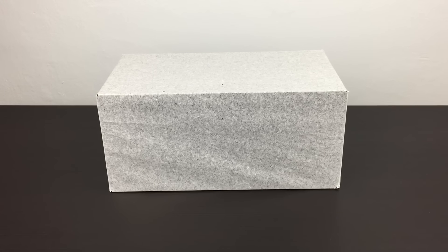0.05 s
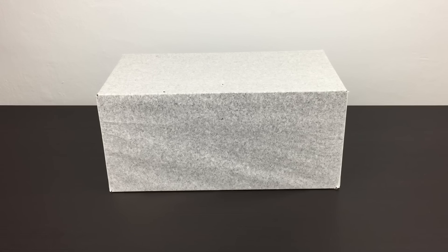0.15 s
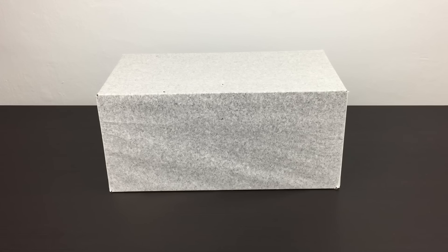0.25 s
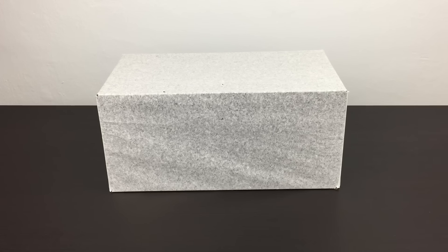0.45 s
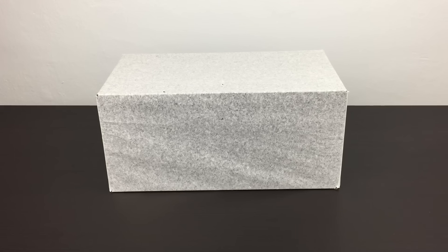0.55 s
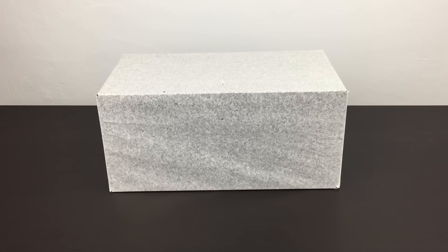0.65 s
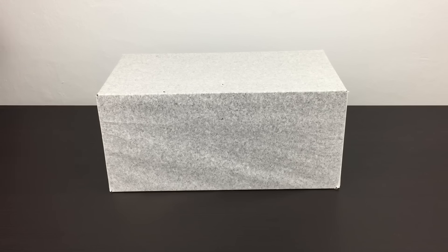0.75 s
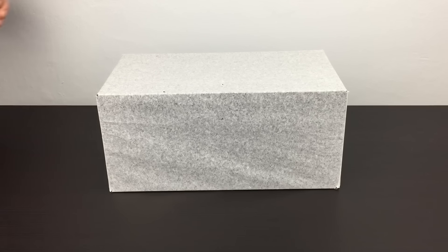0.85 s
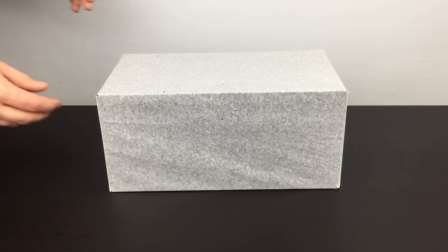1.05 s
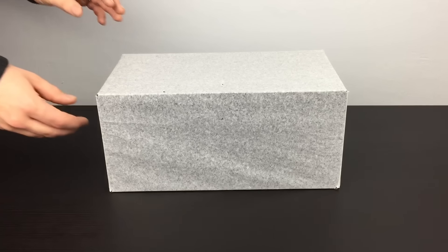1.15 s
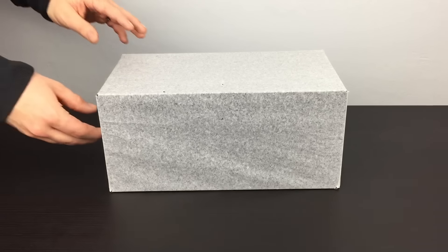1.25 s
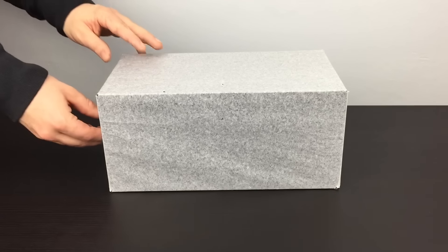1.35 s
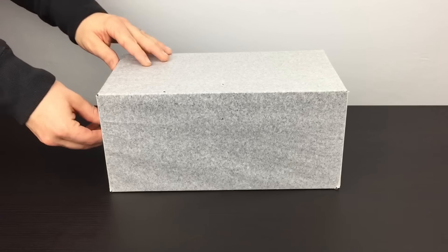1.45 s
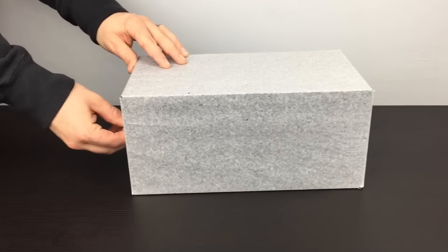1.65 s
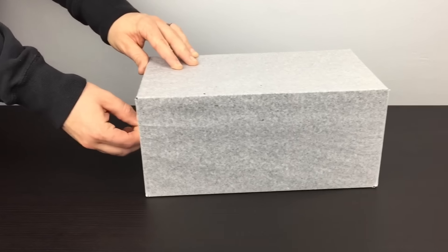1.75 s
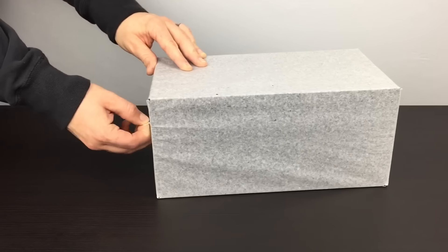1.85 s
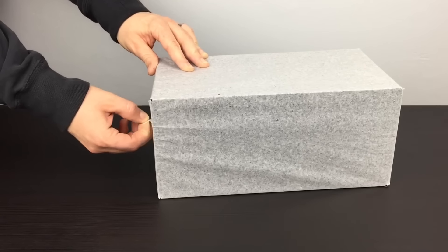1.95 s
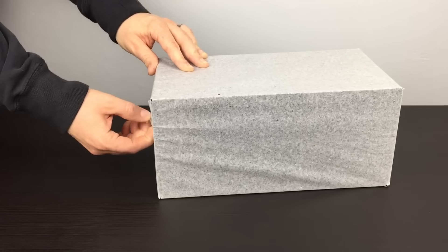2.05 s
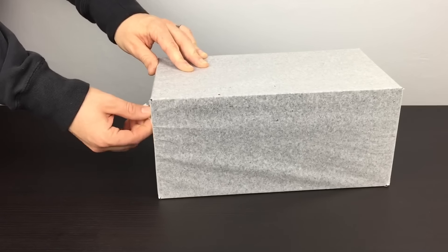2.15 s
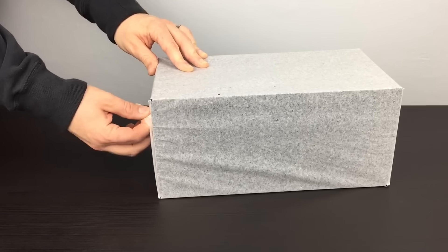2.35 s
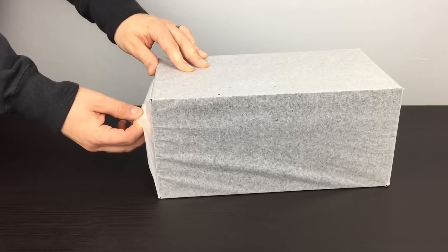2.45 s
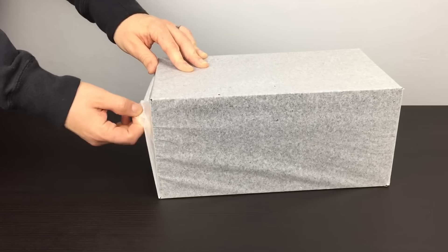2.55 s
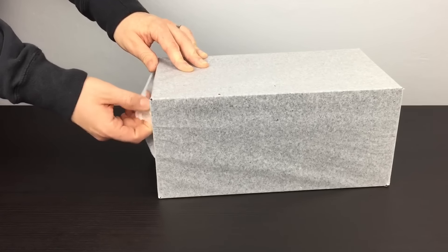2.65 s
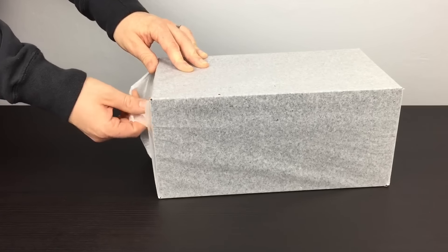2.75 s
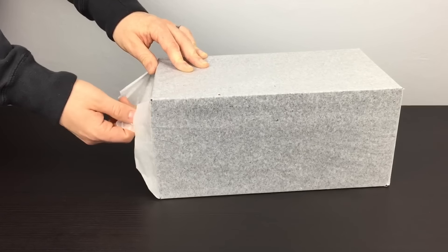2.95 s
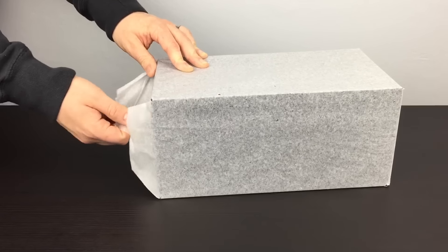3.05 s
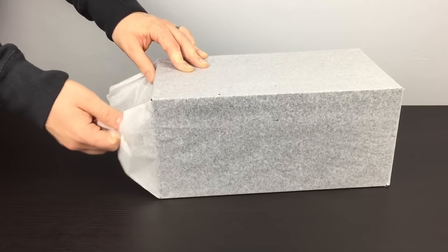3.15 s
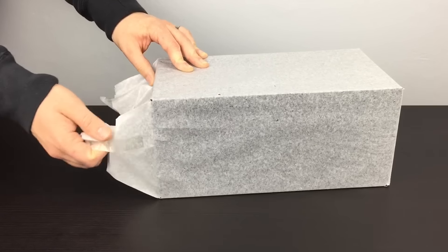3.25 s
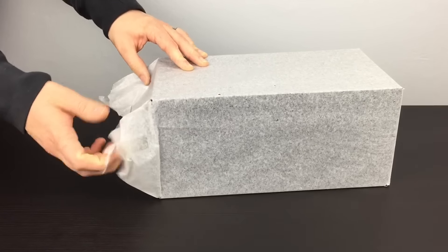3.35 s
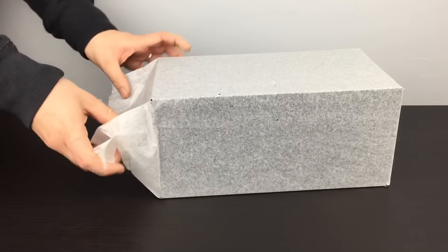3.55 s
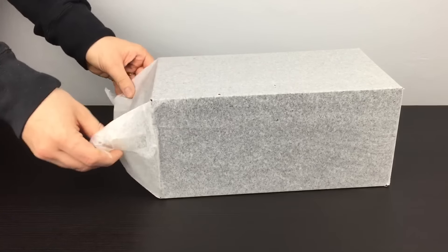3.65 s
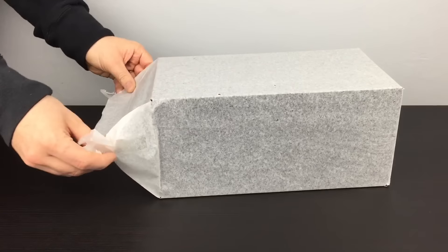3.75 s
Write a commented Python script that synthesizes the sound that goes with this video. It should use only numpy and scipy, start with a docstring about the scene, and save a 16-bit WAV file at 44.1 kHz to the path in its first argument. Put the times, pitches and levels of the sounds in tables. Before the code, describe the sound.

A few soft, hollow finger taps on a cardboard box sound through the first second and a half, with a thin, faint tick near 0.4 seconds and a brief sliding rub at about 1.5. From 1.9 seconds thin wrapping paper is picked at and pulled, crackling in short, uneven bursts with sharp snaps among the tiny clicks. The sheet flaps and the box walls boom lightly under the hands. At about 4.7 seconds a louder tear comes with a dull thud of the box on the table. Dense tearing and crumpling continue, with another bump near 5.9 and a strong crackling stretch from 6.2 to 6.6. The paper dies down around 7 seconds, then softer rustles and small bumps return until nearly 8. Everything is close, in a small room with slight echo and a faint low hum.

```python
"""Unwrapping a cardboard box.

Fingers tap an empty box on a table in a small room; thin paper is picked at, torn and crumpled off it.
Creases buckle in dense swarms of tiny clicks with louder snaps among them. The sheet flaps, the walls
boom under the hands, the box thuds on the table."""
import sys
import numpy as np
from scipy import signal
from scipy.fft import rfft, irfft
from scipy.io import wavfile

SR = 44100
rng = np.random.default_rng(int(sys.argv[2]) if len(sys.argv) > 2 else 0)


def wrap_up_sound(samples):
    """Save the sound to the file named by the first command line argument, as 16-bit audio."""
    columns = np.atleast_2d(samples).T
    # keep every value between -1 and 1, then stretch to whole-number steps
    tamed = np.clip(columns, -1, 1)
    steps = np.round(tamed * 32767).astype(np.int16)
    wavfile.write(sys.argv[1], SR, steps)


N = 347949
STEP = 32   # samples per slow-control point

# room noise spectrum: freq_hz, density_db
HUM_SPECTRUM = [(15, -62), (25, -29), (50, -14), (91, -10), (133, -7), (165, -28), (184, 1), (205, -6),
                (235, -15), (324, -18.5), (2890, -26), (4950, -28), (5980, -29), (15800, -36)]
# notches from the table echo at the microphone: centre_hz, width_hz, depth (0-1)
TABLE_NOTCHES = [(4940, 320, 0.37), (7570, 700, 0.29), (10350, 460, 0.65)]
# thin double tick: start_s, level_db
TICKS = [(.3554, -15.5), (.3561, -13.5)]
# box shifting on the table: start_s, level_db, pitch_hz
THUDS = [(1.27, -49, 146), (1.54, -45, 141), (1.824, -43, 165), (2.162, -41.5, 139), (2.477, -47, 113),
         (2.762, -46, 135), (3.109, -39.5, 138), (3.5, -53, 50), (3.695, -48, 124), (4.655, -39, 121),
         (4.728, -32, 159.5), (5.012, -47, 145), (5.156, -45, 139), (5.88, -35, 121), (6.233, -42, 117),
         (6.672, -47, 144), (7.328, -51, 67), (7.478, -45.5, 127), (7.563, -49, 83.6), (7.68, -50, 121)]
# cardboard wall modes: pitch_hz, level_db, t60_s
WALL_MODES = [(213, -14.5, 0.18), (270, -16, 0.14), (340, -15, 0.084), (401, 0.5, 0.086), (506, -8, 0.11),
              (574, -6, 0.076), (649, -5, 0.1), (810, -15, 0.1), (2100, 17, 0.056), (2300, -16, .04)]
# fingers landing on the box: start_s, level_db, lowpass_hz
TAPS = [(.002, -41.5, 600), (.021, -39, 596), (.037, -41, 600), (0.052, -52, 590), (0.077, -58, 710),
        (.092, -53, 700), (.852, -46, 500), (.875, -47, 496), (0.93, -59, 450), (1.085, -58.5, 1200),
        (1.271, -35.5, 890), (1.293, -42, 1010), (1.329, -42, 900), (1.551, -56, 300)]
# spectrum of the handled box: freq_hz, density_db
BOOM_SPECTRUM = [(24, -57), (40, -83), (115, -26), (161, -7), (194, 0), (312, 1.5), (350, -6.5), (392, -8),
                 (578, -1.5), (800, -12.5), (1040, -34), (1760, -120)]
# paper spectrum: freq_hz, density_db
PAPER_SPECTRUM = [(410, -36), (700, -5), (1790, -5.5), (2430, -3.5), (3750, -6.5), (5020, -9.5),
                  (6450, -1.5), (9220, -10), (10300, -5), (11900, -11.5), (15000, -8), (15900, -24.5),
                  (16500, -31)]
# hands sliding (0) to creases breaking (1): time_s, crispness
CRISPNESS = [(0, 0.3), (1.87, 0.02), (1.89, 0.98), (7.27, 1.0), (7.285, 0.46), (7.42, 0.3), (7.44, 0.78),
             (7.89, 0.9)]
# pulls, rubs and squeezes: start_s, swell_s, hold_s, crackle_db, fizz_db, flap_db, boom_db, taut_db,
# boom_hz; fizz to taut are relative to crackle
PULLS = [(0.0, 0.003, 0.056, -66, -3, -2, 13, -8, 360), (0.106, 0.057, 0.01, -61, 0.5, -5, -2, -20.2, 440),
         (0.849, 0.0025, 0.027, -64.5, -1.5, 2.5, 8.5, -14, 308),
         (1.068, 0.012, 0.02, -67, 7, -2.5, -5, -16, 457),
         (1.269, 0.0047, 0.041, -57, -2, -10, 7.5, -8.1, 415),
         (1.534, 0.073, 0.33, -51.5, -4, -1.5, -8, -8, 297),
         (1.886, 0.012, 0.071, -49, -2.5, -6.5, -9, -27, 290),
         (2.067, 0.031, 0.0023, -58, 5.5, -6, -9, -18.2, 240),
         (2.13, 0.024, 0.0022, -39.5, -1.5, 0, -6, -19, 303),
         (2.23, 0.082, 0.028, -53.5, -0.3, -6, -13, -3, 260),
         (2.413, 0.066, 0.056, -47.5, -5, -6, -11.4, -15, 360),
         (2.492, 0.037, 0.037, -45.5, -18, -2, -11.7, -17.9, 440),
         (2.587, 0.084, 0.036, -45.5, -2.5, -4.2, -13, -16.5, 390),
         (2.738, 0.0035, 0.0022, -41, 4, -0.5, -5.5, -20, 308),
         (2.773, 0.0074, 0.014, -40.5, -5, -11, -15, -20, 320),
         (2.847, 0.024, 0.002, -39, -4.5, -1.5, -4.5, -18.2, 430),
         (2.903, 0.005, 0.014, -49.5, -10, -3, -5, -3, 350),
         (2.998, 0.021, 0.011, -47, -6, -2, -5.5, -18, 510),
         (3.069, 0.02, 0.052, -47, -1, 1.5, -4, -16, 403),
         (3.229, 0.048, 0.069, -44, -2.5, -4.5, -7.8, -25, 316),
         (3.411, 0.019, 0.034, -47.9, -1, -4.5, -10.5, -15, 344),
         (3.489, 0.012, 0.002, -48.5, -5, -5, -0.5, -9, 230),
         (3.593, 0.081, 0.15, -42.5, -3, -3.5, -6.5, -13, 384),
         (3.846, 0.039, 0.003, -40.5, -1, -5.5, -8, -19.4, 350),
         (3.912, 0.076, 0.07, -45.0, -2.5, -4, -5.5, -18, 383),
         (4.153, 0.012, 0.002, -54.5, 2, -3, -11.5, -17, 490),
         (4.23, 0.011, 0.005, -55.5, 2.5, -5, -2, -17.2, 300),
         (4.277, 0.039, 0.002, -51.5, -0.5, -0.5, -13, -5, 480),
         (4.387, 0.092, 0.038, -45, -1.5, -1.5, -3.5, -12, 437),
         (4.568, 0.023, 0.009, -39, -4, -8.5, -8, -26, 360),
         (4.635, 0.064, 0.067, -30.5, 0.2, -4, -7.5, -17, 350),
         (4.859, 0.029, 0.068, -39.5, -1.5, -3, -7.5, -11, 460),
         (4.987, 0.004, 0.021, -39.5, -1.5, -5, -13, -25, 500),
         (5.134, 0.034, 0.033, -34, -2, -4, -15, -10, 414),
         (5.269, 0.052, 0.022, -32, 2, -0.2, -6.2, -5.5, 460),
         (5.509, 0.013, 0.051, -57.6, -9, -3, -10.5, 7.5, 350),
         (5.565, 0.06, 0.146, -36.6, 2, -9.5, -10, -6.5, 330),
         (5.72, 0.0037, 0.17, -35.5, -1, -7.5, -8, -5.5, 315),
         (5.898, 0.032, 0.053, -43, 3.7, -2.5, -4.5, -6, 370),
         (5.983, 0.013, 0.033, -46.5, -3, -6, -12.5, -18, 340),
         (6.146, 0.061, 0.0022, -50, -1.4, -11, -10, -3, 300),
         (6.22, 0.0048, 0.09, -42.5, -1, -5.5, -1, -5.7, 360),
         (6.268, 0.037, 0.11, -32, 0.5, -4, -7, -8, 420), (6.37, 0.038, 0.16, -31, 2, -6, -17.5, -14, 473),
         (6.577, 0.041, 0.032, -37, 3, -6.5, -16.5, -11, 480),
         (6.721, 0.015, 0.14, -47.5, 0.2, -4.5, -9.6, -15, 390),
         (6.902, 0.02, 0.044, -57.5, 2, -8, -15, -11, 320),
         (7.12, 0.056, 0.076, -73, -2, -1.5, -3, -12, 270),
         (7.28, 0.014, 0.064, -48, -4, -12, -20, -6.5, 260),
         (7.429, 0.028, 0.046, -50.2, -1.5, 0.5, -4.5, -18, 300),
         (7.552, 0.022, 0.011, -50, -5.6, 0.5, -10, -14.8, 390),
         (7.662, 0.029, 0.081, -65, -2, 5, -5, 0, 260), (7.789, 0.086, 0.048, -45.5, 0, 0.8, -9, -9, 372)]
# loudest creases: start_s, level_db, pitch_hz, treble_db (relative to level)
SNAPS = [(1.5374, -33, 1780, -21), (1.8905, -22.5, 4300, -23), (1.9054, -17.5, 3670, -29),
         (1.937, -26, 6070, -23), (1.9424, -22.5, 6060, -26), (1.9604, -19.5, 6300, -25),
         (1.9829, -23, 6140, -17), (2.0047, -24, 6100, -16), (2.0976, -31, 6160, -18),
         (2.13, -31, 2920, -18), (2.148, -17, 1430, -16), (2.257, -29, 6090, -20), (2.2744, -40, 1860, -11),
         (2.2913, -26.5, 6700, -12), (2.3094, -32, 3330, -10), (2.406, -32, 2430, -17.5),
         (2.4389, -33, 1370, -13), (2.4504, -31, 1410, -13), (2.4566, -27.5, 2410, -6),
         (2.5077, -24.5, 3760, -13), (2.5416, -29, 2410, -8), (2.6509, -37, 6310, -15),
         (2.7414, -28, 2380, -22), (2.7784, -32, 6420, -16), (2.7844, -30, 2710, -18),
         (2.8214, -37, 2350, -9), (2.853, -27, 2480, -7), (2.8654, -14, 3660, -14.5),
         (2.9096, -21, 1460, -15), (3.02, -32, 2530, -12), (3.0859, -38, 1810, -17), (3.25, -34, 2450, -19),
         (3.2634, -34, 1520, -16), (3.2844, -26, 3180, -19), (3.3042, -26, 2300, -12),
         (3.4366, -35, 2120, -13), (3.4585, -23.5, 3850, -16), (3.4986, -31, 1890, -16),
         (3.5423, -33, 4020, -20), (3.6341, -36, 1020, -18), (3.6642, -22, 2010, -15),
         (3.7127, -14.5, 4210, -15.5), (3.7524, -22, 2070, -18), (3.7874, -24, 1970, -15),
         (3.8871, -18.5, 2480, -14), (3.933, -25, 6310, -15), (3.9544, -28, 2090, -11),
         (3.9855, -19.5, 5940, -17), (3.9994, -22, 1940, -9), (4.0387, -27, 2520, -19),
         (4.1828, -25.5, 2240, -24), (4.2472, -30, 5200, -16), (4.3057, -31, 1710, -24),
         (4.4076, -26.5, 1210, -22), (4.465, -18.5, 2440, -16), (4.5504, -29, 2590, -14),
         (4.579, -25.5, 5860, -14), (4.5885, -25, 6970, -22), (4.5955, -24, 2430, -16),
         (4.6378, -20, 3020, -16), (4.6585, -12.5, 2170, -14), (4.706, -14, 2760, -10),
         (4.75, -12, 5850, -16), (4.87, -20, 1900, -16), (4.887, -19, 6500, -18),
         (4.9096, -16.5, 6080, -21.5), (4.9886, -21.5, 1080, -8), (5.053, -29, 2450, -17),
         (5.1372, -35, 2920, -17), (5.1575, -18, 6640, -12), (5.2774, -21, 3530, -15),
         (5.2987, -12, 1450, -18), (5.3092, -16.5, 1810, -7), (5.5245, -36, 1770, -12),
         (5.548, -40, 1830, -23), (5.568, -19.5, 1580, -12.5), (5.5914, -18.5, 1940, -21),
         (5.608, -15, 6380, -23), (5.6384, -18, 3380, -15), (5.6585, -16, 6480, -10),
         (5.7237, -14, 1480, -9), (5.8314, -29, 2390, -14), (6.158, -36, 1710, -15),
         (6.1993, -37, 1800, -12), (6.222, -27, 1790, -9), (6.257, -26, 1660, -14),
         (6.2722, -14.5, 1770, -20), (6.3036, -22, 5810, -12), (6.3474, -15, 1750, -8),
         (6.399, -21, 1990, -24), (6.414, -14, 4470, -23), (6.4388, -7.5, 4000, -23),
         (6.5554, -20, 6710, -14), (6.6051, -19.5, 1690, -1.5), (6.7714, -26, 2730, -19),
         (6.8331, -26, 1360, -15), (6.8604, -29, 2100, -14), (7.0354, -41, 5870, -14),
         (7.089, -40, 3000, -18), (7.181, -49, 1960, -19), (7.2838, -41, 2000, -20),
         (7.3314, -27.5, 2190, -14), (7.4425, -42, 1870, -16), (7.4817, -30, 2380, -14),
         (7.5576, -30, 1020, -18), (7.6123, -30, 1020, -28), (7.794, -42, 1500, -10),
         (7.8366, -37, 1610, -13), (7.859, -27, 1750, -8)]


def from_db(db):
    """Decibels to gain."""
    return 10 ** (np.asarray(db) / 20)


def decay(t, t60_s):
    """Exponential fade, 60 dB in t60_s."""
    return from_db(-60 * t / t60_s)


def unit_rms(x):
    """Scale to rms 1."""
    return x / np.sqrt(np.mean(x ** 2) + 1e-20)


def high_pass(x, hz, order=4):
    """Butterworth high-pass."""
    return signal.sosfilt(signal.butter(order, hz, "high", fs=SR, output="sos"), x)


def spectrum_db(spectrum, hz):
    """Read a spectrum on a log-frequency axis."""
    freq_hz, density_db = np.transpose(spectrum)
    return np.interp(np.log(hz), np.log(freq_hz), density_db)


def per_sample(control):
    """Slow control to audio rate."""
    return np.interp(np.arange(N) / STEP, np.arange(len(control)), control)


def drift(rate_hz):
    """Slow random control, rms 1."""
    r = np.exp(-2 * np.pi * rate_hz * STEP / SR)
    noise = rng.standard_normal(N // STEP + 2002)
    return unit_rms(signal.lfilter([1], [1, -2 * r, r * r], noise)[2000:])


def ring(clicks, hz, t60_s):
    """Resonator: a unit click starts a decaying unit sine."""
    r, w = decay(1 / SR, t60_s), 2 * np.pi * hz / SR
    return signal.lfilter([0, np.sin(w)], [1, -2 * r * np.cos(w), r * r], clicks + 1e-18)


def room_hum(level_db=-66.5):
    """Steady room noise, mostly low."""
    hz = np.maximum(np.arange(N // 2 + 1) * SR / N, 1)
    shaped = rfft(rng.standard_normal(N)) * from_db(spectrum_db(HUM_SPECTRUM, hz))
    return from_db(level_db) * unit_rms(irfft(shaped, N))


def room_echoes(x, t60_s=0.43, level_db=-9, patterns_per_s=1.368):
    """Diffuse, slightly dull echoes; the pattern changes as hands and sheet move."""
    t, out = np.arange(SR // 3) / SR, 0
    turn = np.arange(N) / SR * patterns_per_s
    for k in range(3):
        tail = rng.standard_normal(len(t)) * decay(t, t60_s) * (t > .003)
        tail = signal.lfilter([1], [1, -.3], tail)
        share = np.sqrt(2 / 3) * np.cos(np.pi * (turn - k) / 3)
        out += signal.oaconvolve(share * x, tail / np.sqrt(np.sum(tail ** 2)))[:N]
    return from_db(level_db) * out


def table_echo(x):
    """The table-top reflection partly cancels three treble bands."""
    for hz, width_hz, depth in TABLE_NOTCHES:
        x = x - depth * signal.lfilter(*signal.iirpeak(hz, hz / width_hz, fs=SR), x)
    return x


def tick():
    """Two top-octave clicks and a thin fading hiss."""
    clicks, since_s = np.zeros(N), np.arange(N) / SR - TICKS[0][0]
    for start_s, level_db in TICKS:
        clicks[round(start_s * SR)] = from_db(level_db)
    hiss = rng.standard_normal(N) * (since_s >= 0) * from_db(-46) * decay(abs(since_s), .3)
    hiss = signal.lfilter([.75, .75], [1], hiss)
    band = signal.butter(5, [9100, 14600], "band", fs=SR, output="sos")
    return signal.sosfilt(band, clicks + hiss) + .05 * high_pass(clicks, 2800)


def box_thuds():
    """The box shifts on the table: a low tone swells fast and rings out."""
    t = np.arange(SR // 4) / SR
    out = np.zeros(N + len(t))
    envelope = (1 - np.exp(-t / 0.01)) * decay(t, 0.17)
    for start_s, level_db, hz in THUDS:
        at = round(start_s * SR)
        out[at:at + len(t)] += from_db(level_db) * envelope * np.sin(2 * np.pi * hz * t)
    return out[:N]


def finger_taps(spread_db=3):
    """A fingertip strikes the wall modes unevenly; a soft touch spares the high ones."""
    start_s, level_db, lowpass_hz = np.transpose(TAPS)
    at = np.round(start_s * SR).astype(int)
    out, uneven_db = np.zeros(N), rng.normal(-3, spread_db, (len(TAPS), len(WALL_MODES)))
    for (hz, mode_db, t60_s), strike_db in zip(WALL_MODES, uneven_db.T):
        clicks = np.zeros(N)
        clicks[at] = from_db(level_db + mode_db + strike_db) / (1 + (hz / lowpass_hz) ** 4)
        out += ring(clicks, hz, t60_s)
    return high_pass(out, 110, order=2)


def crispness(time_s):
    """How cleanly creases break, 0-1."""
    return np.interp(time_s, *np.transpose(CRISPNESS))


def pull_level_db(offset_db=0, release_db_per_s=196.5, onset_db=-12):
    """Power sum of all pulls; each sets in below its top, swells, holds and dies away."""
    start_s, swell_s, hold_s, top_db = np.transpose(PULLS)[:4, :, None]
    since_s = np.arange(N // STEP + 2) * STEP / SR - start_s
    rub_db = -4 * (1 - crispness(start_s))   # a sliding hand sets in softer
    rise_db = (onset_db + rub_db) * np.clip(1 - since_s / swell_s, 0, 1)
    fall_db = release_db_per_s * np.maximum(since_s - swell_s - hold_s, 0)
    power = (since_s >= 0) * from_db(top_db + np.reshape(offset_db, (-1, 1)) + rise_db - fall_db) ** 2
    return per_sample(10 * np.log10(power.sum(axis=0) + 1e-12))


def grains(clumps_db, per_s, spread_db, range_hz, t60_cycles, favoured_hz=1300, lift_db=0,
           spectrum=PAPER_SPECTRUM, pitches=12):
    """Clumped, uneven ringing clicks, rms 1; each pitch comes and goes as the sheet changes shape."""
    sizes = from_db(spread_db * np.minimum(rng.exponential(1, N), 5)) * np.sign(rng.random(N) - .5)
    clicks = sizes * (rng.random(N) < per_s * from_db(clumps_db) / SR)
    pitch_index, out = rng.integers(0, pitches, N), 0
    steps = np.minimum(np.arange(N // STEP + 2) * STEP, N - 1)
    favoured_hz = np.broadcast_to(favoured_hz, N)[steps]
    for k, hz in enumerate(np.geomspace(*range_hz, pitches)):
        band = unit_rms(ring(clicks * (pitch_index == k), hz, t60_cycles / hz))
        shape_db = lift_db * np.exp(-(np.log2(hz / favoured_hz) / 0.35) ** 2) + 2.47 * drift(10.7)
        gain = from_db(spectrum_db(spectrum, hz) + shape_db) * np.sqrt(hz)   # higher rings are wider
        out += band * per_sample(gain)
    return unit_rms(high_pass(out, 0.61 * range_hz[0]))


def crease_flips(per_s=150):
    """Creases flipping in one go: bare wideband clicks."""
    clicks = (rng.random(N) < per_s / SR) * rng.standard_normal(N)
    sizes = from_db(2.6 * np.minimum(rng.exponential(1, N), 3))
    return high_pass(clicks * sizes, 2100, order=2)


def rustle(crackle_db, crisp):
    """Small creases crackle and fizz, the loose sheet flaps, a taut patch rings, the box booms."""
    fizz_db, flap_db, boom_db, taut_db, boom_hz = np.transpose(PULLS)[4:]
    # the strongest pull sets the boom's pitch
    favoured_boom_hz = from_db(pull_level_db(20 * np.log10(boom_hz)) - crackle_db) + 1
    # one buckling crease sets off its neighbours; in a hard pull the swarms merge
    swarm = crisp * per_sample(drift(60)) * np.clip(-(crackle_db + 19) / 24, .3, 1.3)
    crackle = grains(4 * swarm, per_s=5000, spread_db=0.39, range_hz=(2360, 6850), t60_cycles=14.3,
                     favoured_hz=3960, lift_db=3.1)
    fizz = grains(4 * swarm, per_s=7000, spread_db=1.8, range_hz=(7480, 16600), t60_cycles=6.1,
                  favoured_hz=12000, lift_db=.1)
    flap = grains(3 * swarm, per_s=2500, spread_db=1.46, range_hz=(753, 2270), t60_cycles=7.3,
                  favoured_hz=1300, lift_db=2)
    taut = grains(3 * swarm, per_s=900, spread_db=1.8, range_hz=(1653, 1940), t60_cycles=23, pitches=3)
    boom = grains(3 * per_sample(drift(30)), per_s=1400, spread_db=3.3, range_hz=(107.8, 692),
                  t60_cycles=18.2, favoured_hz=favoured_boom_hz, lift_db=3.5, spectrum=BOOM_SPECTRUM)
    return (crackle * from_db(crackle_db)
            + fizz * from_db(pull_level_db(fizz_db, release_db_per_s=244, onset_db=-14.5))
            + flap * from_db(pull_level_db(flap_db, release_db_per_s=169, onset_db=-13))
            + taut * from_db(pull_level_db(taut_db, release_db_per_s=169))
            + boom * from_db(pull_level_db(boom_db, release_db_per_s=168, onset_db=-13))
            + crease_flips() * crisp * from_db(crackle_db + 17.5))


def small_snap_rows(crackle_db, crisp, max_per_s=14):
    """Random lesser snaps that follow the pull's level; columns as in SNAPS."""
    at = np.flatnonzero(rng.random(N) < crisp * max_per_s / SR)
    strength, thinness, pitch = rng.standard_normal((len(at), 3)).T
    level_db = crackle_db[at] + 16.5 + 3 * np.minimum(strength, 1)
    pitch_hz = np.clip(2800 * 2 ** (.8 * pitch), 900, 7500)
    treble_db = -23 + 11 * thinness
    return np.transpose([at / SR, level_db, pitch_hz, treble_db])


def snaps(rows):
    """A crease cracks, rings briefly and sets off a fading run of crackle; thin creases add treble."""
    size = SR // 10
    body, treble, t = np.zeros(N + size), np.zeros(N + size), np.arange(size) / SR
    for start_s, level_db, hz, treble_db in rows:
        noise = rng.standard_normal(size)
        tone = np.sin(2 * np.pi * hz * t) * decay(t, 32 / hz)
        spike = np.sign(noise) * decay(t, .002)
        run = .5 * noise * (1 - np.exp(-t / 0.00095)) * decay(t, 0.067)
        crack = np.sign(noise) * decay(t, 0.0022) + run
        pitched_run = unit_rms(ring(noise, hz, 36 / hz)) * decay(t, .06)
        crisp = crispness(start_s)   # a scuff has little crack
        bite = crisp * (0.33 * crack + .45 * spike)
        at = round(start_s * SR)
        body[at:at + size] += from_db(level_db) * (0.16 * tone + bite + 0.068 * pitched_run)
        treble[at:at + size] += from_db(level_db + treble_db) * 2.24 * crisp * crack
    body = signal.sosfilt(signal.butter(2, [900, 7500], "band", fs=SR, output="sos"), body)
    return (body + high_pass(treble, 9400))[:N]


def scene():
    """Paper and box with their echoes, a dry tick and room noise; mono."""
    crackle_db, crisp = pull_level_db(), crispness(np.arange(N) / SR)
    direct = rustle(crackle_db, crisp) + snaps(SNAPS) + finger_taps() + box_thuds()
    direct += snaps(small_snap_rows(crackle_db, crisp))
    return (table_echo(direct + room_echoes(direct)) + room_hum() + tick())[None]


def record(dry, low_hz=29, stop_hz=16250):
    """The microphone drops the deep bass; the top is cut steeply."""
    low_pass = signal.cheby2(16, 70, stop_hz, fs=SR, output="sos")
    return signal.sosfilt(low_pass, high_pass(dry, low_hz, order=2))


dry = scene()
out = record(dry)
wrap_up_sound(out)
```